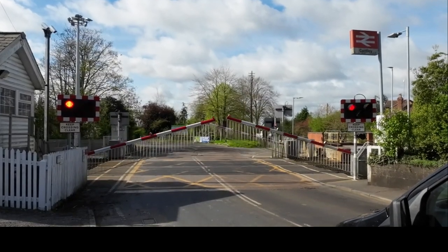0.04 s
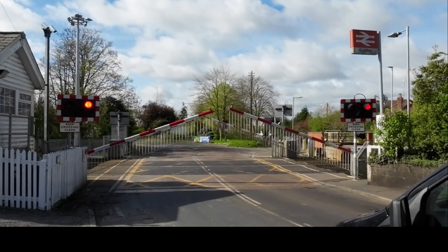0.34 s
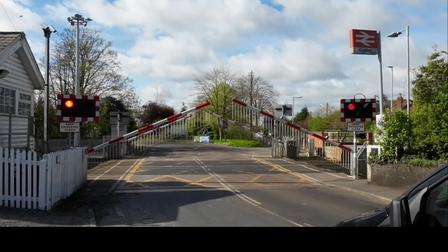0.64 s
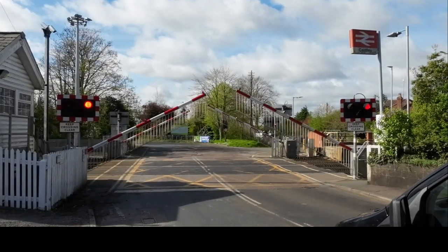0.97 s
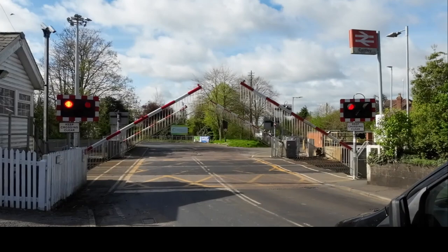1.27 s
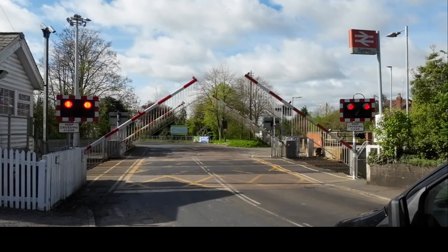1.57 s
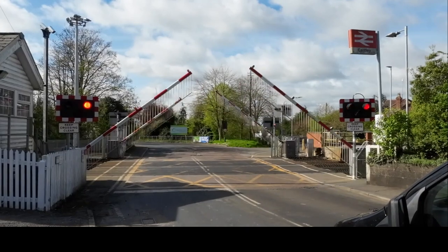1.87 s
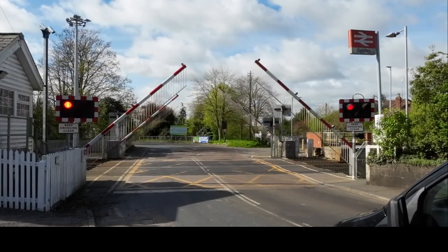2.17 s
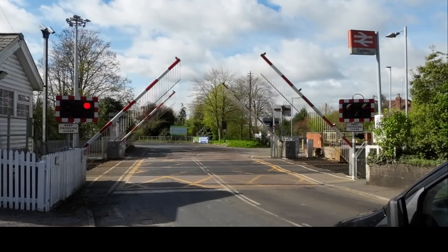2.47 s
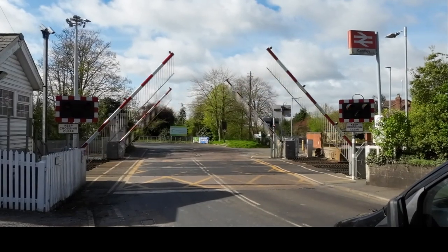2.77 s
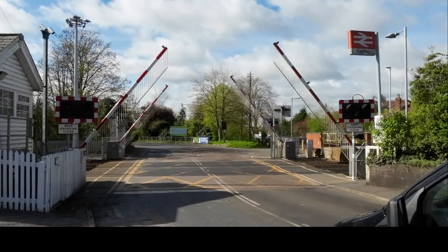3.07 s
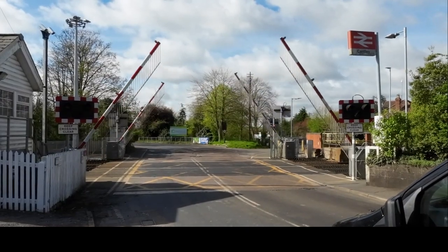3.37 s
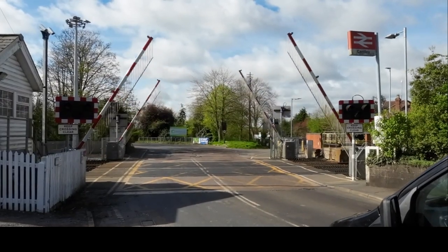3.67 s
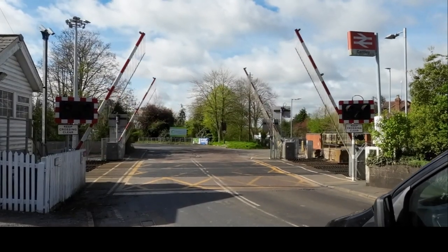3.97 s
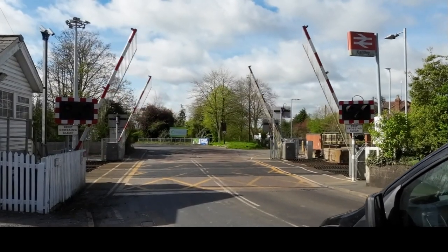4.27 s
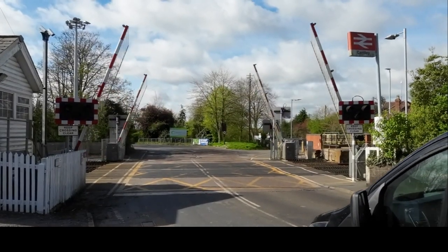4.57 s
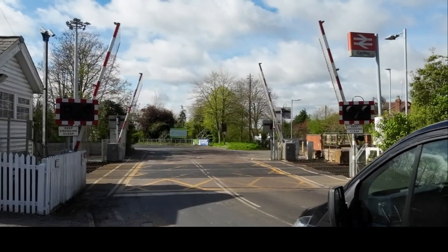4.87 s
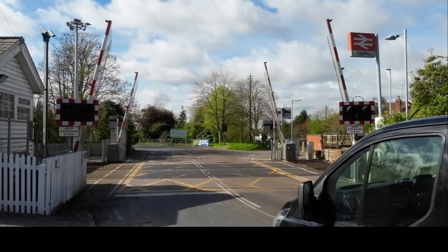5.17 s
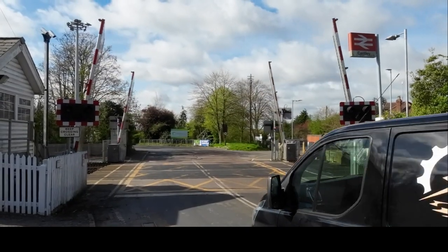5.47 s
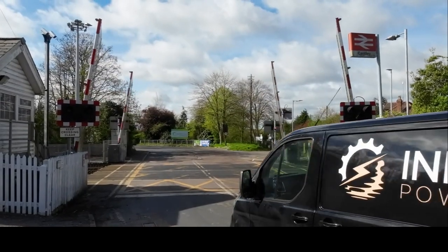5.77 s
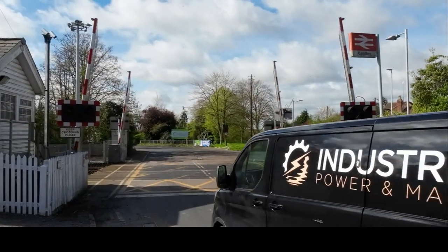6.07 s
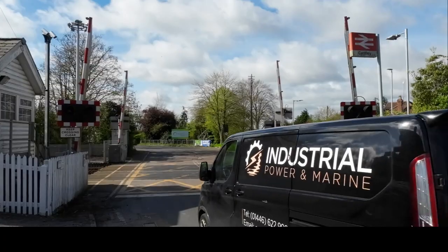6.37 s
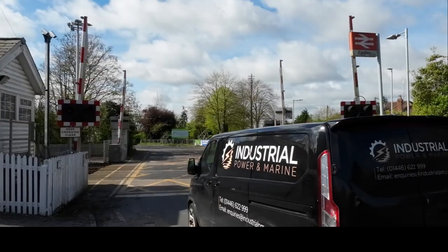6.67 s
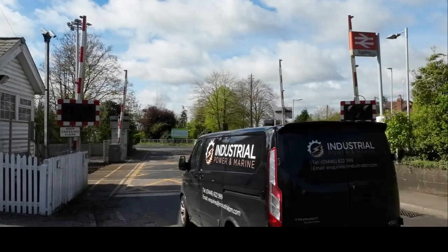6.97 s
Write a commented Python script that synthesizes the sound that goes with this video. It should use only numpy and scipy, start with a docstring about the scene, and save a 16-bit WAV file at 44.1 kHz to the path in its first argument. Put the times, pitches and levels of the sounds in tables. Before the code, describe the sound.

At a railway crossing, a diesel van idles with a low throb while gusty wind rumbles and thumps on the microphone. A barrier clacks twice early on, and hydraulic pumps whine faintly as the arms rise. About four seconds in, the van revs and pulls past close by, with engine clatter and light tyre noise. Small birds whistle over distant traffic, and one fainter clack comes near the end.

```python
"""At a railway crossing, a diesel van idles while the barriers rise, then revs and pulls past the microphone.
Its firings form a pulse train that throbs in the exhaust and excites the resonances of the block; another
car idles behind it. Hydraulic pumps whine, and a barrier clacks twice, then once more faintly near the end.
Small birds whistle over distant traffic and thin high ticks, and the turbulence of a gusty breeze
buffets the microphone."""
import sys
import numpy as np
from scipy import signal
from scipy.fft import rfft, irfft
from scipy.io import wavfile
from scipy.ndimage import uniform_filter1d, map_coordinates

SR = 44100
rng = np.random.default_rng(int(sys.argv[2]) if len(sys.argv) > 2 else 0)


def to_wav(sig):
    """Store sig (one row per channel, or 1-D mono) as 16-bit WAV at the path in sys.argv[1].

    Samples outside -1..1 are clipped; the rate is SR.
    """
    pcm = np.clip(np.atleast_2d(sig), -1, 1) * 32767
    pcm = np.round(pcm).astype(np.int16)
    wavfile.write(sys.argv[1], SR, pcm.T)  # frames by channels


N = 314433


def undb(db):
    """Amplitude ratio of a level in decibels."""
    return 10 ** (np.asarray(db) / 20)


def unit(x):
    """Normalisation to rms 1."""
    return x / np.sqrt(np.mean(x ** 2))


def curves(table):
    """Linear interpolation of each column of a time table, one value a sample."""
    s, *columns = np.transpose(table)
    return [np.interp(np.arange(N) / SR, s, c) for c in columns]


def gains(points, size):
    """Magnitude response through (f/Hz, level/dB) points, interpolated in log frequency."""
    hz, db = np.transpose(points)
    return undb(np.interp(np.log(np.fft.rfftfreq(size, 1 / SR) + 1), np.log(hz), db))


def colour(x, spectrum, resonances=()):
    """Source-filter model: a spectral envelope and resonances shape x; rms 1."""
    size = x.shape[-1]
    f, gain = np.fft.rfftfreq(size, 1 / SR), gains(spectrum, size)
    for hz, width, db in resonances:
        gain = gain * (1 + (undb(db) - 1) / (1 + 2j * (f - hz) / width))
    return unit(irfft(rfft(x) * gain, size))


def band(x, hz, width_hz):
    """Band-pass filtering about hz; rms 1."""
    edges = [hz - width_hz / 2, hz + width_hz / 2]
    return unit(signal.sosfilt(signal.butter(2, edges, "band", fs=SR, output="sos"), x))


def wander(rate_hz):
    """Random modulation: steps at rate_hz, smoothed twice; rms 1."""
    hold = int(SR / rate_hz)
    steps = np.repeat(rng.standard_normal(N // hold + 1), hold)
    return unit(uniform_filter1d(uniform_filter1d(steps, hold), hold)[:N])


def add(out, s, sound):
    """Superposition of a short sound at time s."""
    i = max(int(s * SR), 0)
    out[:, i:i + sound.shape[-1]] += sound[..., :max(N - i, 0)]


# Width of the sound field: f/Hz, side minus mid level/dB
FIELD_WIDTH = [(100, -58), (700, -102), (1150, -21.5), (2000, -20.5), (4000, -7), (5500, -7), (7000, -7.5),
               (9000, -2.5), (12000, -2)]
def noise(size=N):
    """Partial coherence: two channels of noise, alike in the bass and wide in the treble."""
    mid, side = rng.standard_normal((2, size))
    side = irfft(rfft(side) * gains(FIELD_WIDTH, size), size)
    return np.array([mid + side, mid - side])


# Spectrum of distant traffic and leaves: f/Hz, relative level/dB
TOWN_SPECTRUM = [(20, 3), (60, 16.5), (150, 7), (300, 6.5), (470, 7), (570, 1), (1000, 0), (1500, -7.5),
                 (3000, -4.5), (4000, -8), (5200, 0), (6800, -17), (9700, -15.5), (11200, -17.5),
                 (12800, -30)]
def town(level_db=-48.5, swell_db=0.5):
    """Incoherent sources: distant traffic and leaves sum to a noise that swells slightly."""
    return undb(level_db + swell_db * wander(3.2)) * colour(noise(), TOWN_SPECTRUM)


def ticks(every_s=0.143, hz=10350, width_hz=450, length_s=0.0064, level_db=-59.5):
    """Narrow-band noise in Gaussian envelopes is heard as an even run of faint, high ticks."""
    out, t = np.zeros((2, N)), np.arange(SR // 20) / SR
    envelope = undb(level_db) * np.exp(-(t / length_s - 2) ** 2)
    for k in range(1, 9):
        add(out, k * every_s - 2 * length_s, envelope * band(noise(len(t)), hz, width_hz))
    return out


def twitter(from_s=1.2, span_s=3.1, centre_hz=4950, spread_hz=550, slide_hz=250):
    """A random process scatters the notes of far birds in time and pitch; rows as in BIRD_NOTES."""
    notes = []
    for when, pitch, slide in rng.random((16, 3)):
        hz = centre_hz + spread_hz * (2 * pitch - 1)
        notes.append((from_s + span_s * when, 0.04012, hz, hz + slide_hz * (2 * slide - 1), -60))
    return notes


# Birds' notes: t/s, duration/s, start f/Hz, end f/Hz, relative level/dB
BIRD_NOTES = [(1.39, .2, 8000, 7530, -63), (1.65, .22, 7880, 7500, -64.5), (1.91, .18, 7850, 7450, -58.5),
              (2.19, .07, 6600, 6240, -57.5), (2.38, .16, 4530, 4500, -56), (2.371, .07, 6500, 6100, -61),
              (3.503, .033, 4200, 4950, -55), (3.78, .073, 6250, 6080, -59), (3.867, .03, 5050, 4750, -53),
              (5.81, .06, 3930, 4100, -54), (6.004, .05, 4680, 4570, -50), (6.068, .07, 3940, 4200, -50),
              (6.258, .05, 4660, 4590, -47.5), (6.26, .085, 6600, 6050, -55),
              (6.32, .08, 3890, 4220, -52.5), (6.6, .04, 3980, 4020, -56)]
def birds(song_db=-5, flutter_db=4.5, waver=0.007, echo_db=-5, echo_s=0.03):
    """Frequency modulation: thin whistles glide and level off; scattering by trees adds an echo."""
    song, wobble = np.zeros((2, N)), 1 + waver * wander(260)
    repeated_call = [(0.1 + k * 0.45, 0.12, 5070, 4900, -58) for k in range(4)]
    for s, length, start_hz, end_hz, db in repeated_call + BIRD_NOTES + twitter():
        u = np.linspace(0, 1, int(length * SR))
        hz = (end_hz + (start_hz - end_hz) * (1 - u) ** 1.4) * wobble[int(s * SR):][:len(u)]
        envelope = undb(db) * np.sqrt(2 * np.abs(np.sin(np.pi * u)))
        add(song, s, envelope * np.sin(2 * np.pi * np.cumsum(hz) / SR))
    song *= undb(song_db + flutter_db * wander(90))
    t = np.arange(SR // 3) / SR
    trees = unit(rng.standard_normal((2, len(t))) * np.exp(-t / echo_s)) / np.sqrt(len(t))
    return song + undb(echo_db) * signal.fftconvolve(song, trees, axes=1)[:, :N]


# Lines of the pumps' whine: f/Hz, level before the gain/dB
PUMP_WHINE = [(727, -68), (813, -66.5), (1048, -61), (1700, -63), (1750, -65), (2309, -67.5), (2449, -67.5),
              (2676, -71), (2778, -71.5), (3260, -69.5), (3480, -66)]
# Course of the whine: t/s, gain/dB
PUMP_GAIN = [(0, 1), (5.6, 2), (6.4, -14)]
def pumps(width_hz=65):
    """Line broadening: the barriers' hydraulic pumps whine roughly, in narrow bands of noise."""
    lines = sum(undb(db) * band(rng.standard_normal(N), hz, width_hz) for hz, db in PUMP_WHINE)
    return undb(curves(PUMP_GAIN)[0]) * lines


# Impacts of the barrier: t/s, crack level/dB, ring f/Hz, ring level/dB
IMPACTS = [(0.683, -32, 2810, -30), (0.696, -47, 3090, -37), (0.877, -36, 2631, -29.5),
           (6.836, -43, 2600, -62)]
# Spectrum of the crack: f/Hz, relative level/dB
CRACK_SPECTRUM = [(200, 4), (800, 2), (2800, 1.5), (5200, 0.5), (7000, -9), (10000, -10.5), (13000, -39)]
# Modes of the barrier's panels: f/Hz, bandwidth/Hz, gain/dB
PANEL_MODES = [(915, 120, 11), (1292, 48, 14), (1765, 25, 13.5), (2890, 220, 11), (3570, 110, 7.5),
               (3970, 55, 1)]
def barrier(attack_s=0.0014, crack_s=0.021, street_s=0.038, ring_s=0.0054, linger_s=0.032):
    """Impact excitation: the barrier's hanging skirt rings on two close modes; the street adds a tail."""
    out, t = np.zeros((2, N)), np.arange(SR // 4) / SR
    attack = 1 - np.exp(-t / attack_s)
    crack_decay = np.exp(-t / crack_s) + undb(-11) * np.exp(-t / street_s)
    ring_decay = np.exp(-t / ring_s) + undb(-17) * np.exp(-t / linger_s)
    for s, crack_db, hz, ring_db in IMPACTS:
        crack = crack_decay * colour(noise(len(t)), CRACK_SPECTRUM, PANEL_MODES)
        modes = np.sin(2 * np.pi * hz * t) + undb(-5) * np.sin(2 * np.pi * 1.065 * hz * t)
        add(out, s, attack * (undb(crack_db) * crack + undb(ring_db) * ring_decay * modes))
    return out


# Strength of the breeze: t/s, level/dB
GUSTS = [(0, -26), (.25, -23.5), (.45, -21.5), (.9, -28.5), (1.1, -31), (1.76, -33), (1.9, -22),
         (2.25, -31), (2.6, -22), (2.95, -28), (3.3, -20), (3.65, -27), (4.1, -27.5), (4.55, -25),
         (4.78, -18.5), (5.12, -22.5), (5.4, -22), (5.9, -31.5), (6.1, -22), (6.3, -27.5), (6.5, -25),
         (6.7, -28.5), (6.87, -22), (7.13, -25)]
# Spectrum of the turbulence: f/Hz, relative level/dB
WIND_SPECTRUM = [(8, -21), (18, 1.5), (28, -3), (45, -5.5), (70, -14.5), (110, -23), (200, -37),
                 (400, -47.5), (900, -109)]
def breeze(flutter_db=2.0):
    """Turbulent pressure rumbles on the microphone, swelling with every gust."""
    rumble = undb(flutter_db * wander(14)) * colour(rng.standard_normal(N), WIND_SPECTRUM)
    return undb(curves(GUSTS)[0]) * unit(rumble)


def swing(hz, skew, order=3):
    """A pressure wavelet strongest near hz: phase skew (cycles) tilts it, a higher order rounds it."""
    t = np.arange(-SR // 20, SR // 20) / SR
    wavelet = np.exp(2j * np.pi * skew) / (1 - 2j * np.pi * hz * t / (order - 1)) ** order
    return wavelet.real * np.hanning(len(t))


def eddies(count=16, weakest_db=-13, range_db=8, centre_hz=110, spread_octaves=0.88):
    """Intermittency of turbulence: weak eddies bump the microphone at random, harder in a gust."""
    out, gust_db = np.zeros((2, N)), curves(GUSTS)[0]
    for when, size, pitch, skew in rng.random((count, 4)):
        i = int(when * N)
        bump = swing(centre_hz * 2 ** (spread_octaves * (2 * pitch - 1)), skew)
        add(out, (i - len(bump) / 2) / SR, undb(gust_db[i] + weakest_db + range_db * size) * bump)
    return out


# Strongest eddies: t/s, thump level/dB, thump f/Hz before pitch_ratio, pop level/dB, pop f/Hz
STRONG_EDDIES = [(.136, -16.5, 75, -34, 190), (0.167, -7, 48.6, -45, 160), (.239, -8.5, 46, -28.5, 200),
                 (.275, -13, 29.8, -45, 150), (0.331, -23, 100, -15, 154), (.506, -21, 90, -34, 169.8),
                 (0.525, -27, 80, -30, 230), (.592, -22, 85.5, -38, 150), (.66, -17, 59.6, -24.5, 229),
                 (0.73, -20, 90, -21, 197), (.894, -18.5, 79, -39, 170), (0.944, -13.5, 57, -46, 150),
                 (1.38, -16.5, 91, -30, 180), (1.402, -22.5, 120, -43, 190), (1.823, -29, 130, -49, 170),
                 (1.851, -10, 31.2, -34, 150), (2.323, -27, 110, -27.5, 170), (2.557, -11.5, 70, -41, 150),
                 (2.699, -13, 33.52, -49, 150), (2.732, -9, 32.6, -36, 160.1), (2.912, -20, 81, -31, 200.2),
                 (3.013, -26, 90, -30, 210), (3.044, -28, 80, -33, 220), (3.166, -18.5, 69.9, -31, 180),
                 (3.199, -18, 130, -26, 314), (3.239, -9.5, 28, -36, 350), (3.34, -12.5, 51.94, -24, 200),
                 (3.347, -19, 150, -20, 305), (3.414, -13, 30, -46, 150), (3.516, -15.5, 81.5, -33, 190),
                 (3.646, -16.5, 83, -26, 240), (3.809, -17, 50, -46, 150), (4.468, -16, 54.6, -49, 150),
                 (4.63, -15, 65, -33, 150), (4.682, -25, 65, -41, 170), (4.715, -9.5, 59, -42, 170.2),
                 (4.796, -23, 70, -19, 190), (5.261, -27, 150, -20.5, 218), (5.383, -13, 84.5, -29, 200),
                 (5.553, -18, 131, -22.5, 266), (5.672, -19, 130, -16, 240), (6.085, -17, 55, -48, 149.5),
                 (6.141, -20, 60, -42, 150), (6.485, -15, 65.6, -40, 150), (6.821, -7.5, 78.7, -21, 250),
                 (6.847, -8, 75, -22, 250), (6.866, -16, 149.7, -22, 230.3), (6.878, -6, 172, -29, 250),
                 (6.893, -20, 130, -25, 190), (6.909, -20, 90, -34, 170.1), (6.971, -7.5, 64, -10, 275),
                 (6.98, -21.5, 557, -26, 657)]
# Spectrum of an eddy breaking up: f/Hz, relative level/dB
FLURRY_SPECTRUM = [(100, 14), (250, 4), (420, -4.5), (650, -10.5), (1100, -20.5), (1600, -52)]
def buffets(pitch_ratio=0.71, trail_s=0.00557, lopsided=0.23, flurry_db=-15, flurry_s=0.0099):
    """Eddy cascade: a large eddy thumps the microphone; a small one trails it, pops and breaks up."""
    out, skews = np.zeros((2, N)), rng.random((len(STRONG_EDDIES), 2))
    for (s, db, hz, pop_db, pop_hz), (lean, pop_skew) in zip(STRONG_EDDIES, skews):
        thump = undb(db) * swing(pitch_ratio * hz, lopsided * (lean - 0.5))
        t = (np.arange(len(thump)) - len(thump) / 2) / SR
        envelope = undb(flurry_db) * np.exp(-(t / flurry_s) ** 2)
        flurry = envelope * colour(rng.standard_normal(len(t)), FLURRY_SPECTRUM)
        add(out, s + t[0], thump)
        add(out, s + t[0] + trail_s, undb(pop_db) * (swing(pop_hz, pop_skew, order=6) + flurry))
    return out


# Upper lines of an exhaust: multiple of the firing rate, relative level/dB
EXHAUST_ORDERS = [(2.5, -4), (3.5, -10), (4, -2), (4.5, -3), (5, -5), (6, -4), (7, -9), (8, -13), (9, -9.5),
                  (11, -14)]
# Modes of the tailpipe: f/Hz, bandwidth/Hz, gain/dB
PIPE_MODES = [(155, 27, 3), (203, 16, 7.5), (466.3, 30, 11)]
def overtones(firings, rough_db=3.0):
    """Pipe resonance lifts each unsteady exhaust line that crosses it; firings counts elapsed cycles."""
    lines = sum(undb(db + rough_db * wander(6)) * np.sin(2 * np.pi * (order * firings + rng.random()))
                for order, db in EXHAUST_ORDERS)
    return colour(lines, [(80, 0.5), (600, -2.5)], PIPE_MODES)


def waiting_car(firing_hz=27.2, hum_db=-52, upper_db=-53):
    """Periodic firing: the next car idles with a hum at its second harmonic, and overtones above."""
    firings = np.cumsum(firing_hz * (1 + 0.00726 * wander(4.2))) / SR
    hum = unit(np.sin(2 * np.pi * 2 * firings))
    return undb(hum_db) * hum + undb(upper_db) * overtones(firings)


def motion(move_off_s=3.716, accel_m_s2=1.545):
    """Uniform acceleration from rest: the van's speed in m/s and its travel in m."""
    rolling_s = np.maximum(np.arange(N) / SR - move_off_s, 0)
    return accel_m_s2 * rolling_s, accel_m_s2 * rolling_s ** 2 / 2


def nearness(behind_m=0, queue_m=2.08, kerb_m=2.26):
    """Spherical spreading: 1/r gain of a part behind_m behind the van's engine; 1 when alongside."""
    _, travel_m = motion()
    return kerb_m / np.hypot(travel_m - queue_m - behind_m, kerb_m)


# Spectrum of tyres on tarmac: f/Hz, relative level/dB
TYRE_SPECTRUM = [(60, 14), (200, -2), (450, -37), (600, -2), (780, 7), (980, -8.5), (1230, 4), (1600, -5.5),
                 (3000, -16.5), (7000, -45), (12000, -36)]
def tyres(level_db=-54.5, patchy_db=2.5):
    """Rolling noise from the rear axle grows with road speed; level_db holds alongside at 1 m/s."""
    speed_m_s, _ = motion()
    gain = undb(level_db + patchy_db * wander(9.1)) * speed_m_s * nearness(behind_m=2.3)
    return gain * colour(noise(), TYRE_SPECTRUM)


# Brief tones of the passing van: peak t/s, duration/s, f/Hz, glide/(Hz/s), bandwidth/Hz, level/dB
PASSING_TONES = [(4.961, 0.19, 3600, -300, 200.1, -50), (5.38, 0.23, 2126, 0, 70, -51),
                 (5.65, .2, 3407, -150, 150, -49), (5.9, 0.54, 2940, 99, 200, -53),
                 (6.444, 0.37, 2164, 1.5, 129.6, -55), (6.599, 0.47, 1230, -170, 70, -55),
                 (6.6, 0.58, 763, -1, 50, -57)]
def passing_tones():
    """Narrow-band noise is heard as pitch: tones swell, slide a little and fade as the van goes by."""
    out, t = 0, np.arange(N) / SR
    for s, length, hz, glide, width, db in PASSING_TONES:
        lowpass = signal.butter(2, width / 2, fs=SR, output="sos")
        blur = signal.sosfilt(lowpass, rng.standard_normal((2, N)))
        phase = 2 * np.pi * np.cumsum(hz + glide * (t - s)) / SR
        tone = unit(blur[0] * np.cos(phase) + blur[1] * np.sin(phase))
        out = out + undb(db) * np.exp(-(2 * (t - s) / length) ** 2) * tone
    return out


# Firing rate of the van's engine: t/s, f/Hz
FIRING_RATE = [(4.2, 27.98), (4.45, 33.56), (4.6, 37.18), (4.8, 46.4), (5.0, 52.44), (5.15, 51.8),
               (5.52, 48.92), (5.87, 44.5), (6.19, 38.29), (6.45, 41.85), (6.65, 43.2), (7.13, 44.4)]
def crankshaft(unsteady=0.00253):
    """Phase is the integral of frequency: the van's elapsed firing cycles."""
    return np.cumsum(curves(FIRING_RATE)[0] * (1 + unsteady * wander(9))) / SR


def revs():
    """Frequency ratio of the van's engine to its idle, in octaves."""
    firing_hz = curves(FIRING_RATE)[0]
    return np.log2(firing_hz / firing_hz[0])


def bay_gain(idle_db=-45.5, db_per_octave=8, strain_db=1.5):
    """Radiation from the engine bay grows with the revs, with their rate of climb and with nearness."""
    climb = uniform_filter1d(np.maximum(np.gradient(revs()) * SR, 0), SR // 2)  # octaves a second
    return undb(idle_db + db_per_octave * revs() + strain_db * climb) * nearness()


# Spectrum of the diesel knock: f/Hz, relative level/dB
KNOCK_SPECTRUM = [(400, -46), (900, -9.5), (1700, 1), (2300, 0), (3000, 2.5), (3550, -4), (4000, -52),
                  (5400, -18), (7000, -13.5), (12000, -25)]
# Modes of the block and covers: f/Hz, bandwidth/Hz, gain/dB
BLOCK_MODES = [(668, 104, 4.5), (946, 20, 4.5), (1180, 25, 4), (1539, 13, 5.5), (2106, 31, 6.5),
               (2845, 43, 3.5), (3720, 200, 5)]
def knock(firings, idle_db=-63.5, db_per_octave=24, scatter_db=2.2):
    """Impulsive excitation: under load each injection rings the block, rasping out of the wheel arch."""
    index = firings.astype(int)
    size_db = scatter_db * rng.uniform(-1, 1, index[-1] + 1)[index]
    rasp = colour(noise() * undb(size_db) * np.exp(-(firings % 1)), KNOCK_SPECTRUM, BLOCK_MODES)
    return undb(idle_db + db_per_octave * revs()) * nearness(behind_m=0.3) * rasp


# Spectrum of the clatter: f/Hz, relative level/dB
CLATTER_SPECTRUM = [(100, 6), (250, 5), (470, 6.5), (580, -3.5), (1000, 1), (1900, -4), (3100, -6.5),
                    (4100, -12), (5400, -6), (6900, -16.5), (8500, -11.5), (10300, -12.5), (12500, -29.5),
                    (15500, -54)]
# Broad resonance of the engine bay: f/Hz, bandwidth/Hz, gain/dB
BAY_MODE = [(472, 55, 4)]
def clatter(firings, valve_db=-4, scatter_db=3, cylinder_db=3.5, fade_cycles=0.42, wash=0.6):
    """Damped impacts: four unequal cylinders knock the block, and the valve gear ticks in between."""
    stroke = (2 * firings).astype(int)
    chance = rng.uniform(-1.9, 1, stroke[-1] + 1)[stroke]
    cylinder = rng.uniform(-1, 1, 8)[stroke % 8]
    size_db = scatter_db * chance + cylinder_db * cylinder + valve_db * (stroke % 2)
    knocks = undb(size_db) * np.exp(-(2 * firings % 1) / (2 * fade_cycles))
    rattle = colour(noise() * np.hypot(wash, knocks), CLATTER_SPECTRUM, BAY_MODE + BLOCK_MODES)
    treble = rattle - signal.sosfilt(signal.butter(1, 3000, fs=SR, output="sos"), rattle)
    return bay_gain() * (rattle + (undb(0.5) - 1) * treble)


def looped_noise(position):
    """Spline interpolation round a loop of 1024 random values, one per unit of position."""
    return map_coordinates(rng.standard_normal(1024), [position], order=3, mode="grid-wrap")


def gear_whirr(firings, relative_db=-2.5):
    """Periodicity gives a line spectrum: chain, pump and gears repeat one rattle each camshaft turn."""
    camshaft_turns = firings / 4
    rattle = looped_noise(camshaft_turns % 1 * 1024)
    return bay_gain() * undb(relative_db) * colour(rattle, CLATTER_SPECTRUM, BAY_MODE + BLOCK_MODES)


# Boom of the exhaust: t/s, then level/dB of the firing note, its octave and its third harmonic
BOOM_LEVELS = [(0, -35.5, -32, -52), (1.7, -30, -33, -48), (2.9, -25, -29.5, -51), (4.3, -22.5, -32.5, -47),
               (4.6, -21.5, -39, -38), (4.8, -15.5, -33, -36), (5.05, -17, -29, -44),
               (5.4, -16, -34.5, -40), (5.6, -21.5, -33, -36.5), (5.87, -29, -33, -35.5),
               (6.15, -33.5, -29.5, -47), (6.45, -33, -35, -41), (6.7, -30, -32, -52),
               (7.13, -37, -34.5, -43)]
# Spectrum of the gas leaving the tailpipe: f/Hz, relative level/dB
GAS_SPECTRUM = [(45, -12), (75, 4.5), (120, 3), (170, -12.5), (260, -12), (420, -17.5), (700, -51)]
def exhaust(firings, jitter_cycles=0.008, scatter_db=1.5, lump_db=-18, puff_cycles=0.42):
    """A pressure pulse train: the firings give a note, its harmonics and a puff of gas each."""
    unevenness = 1 + revs()
    jittered = firings + jitter_cycles * unevenness * looped_noise(firings)
    strength = undb(scatter_db * unevenness * looped_noise(firings))
    phase = 2 * np.pi * jittered
    note_db, octave_db, third_db = curves(BOOM_LEVELS)
    subharmonic = undb(lump_db) * np.cos(phase / 2)  # strong and weak firings alternate
    note = undb(note_db + 1.2 * wander(15)) * unit(np.cos(phase) + subharmonic)
    octave = undb(octave_db + 1.5 * wander(15)) * unit(np.cos(2 * phase))
    third = undb(third_db) * unit(strength * np.cos(3 * phase))
    upper = undb(-45 + 4.5 * revs()) * unit(strength * overtones(jittered))
    puffs = rng.standard_normal(N) * np.exp(-(firings % 1) / puff_cycles)
    gas = undb(-47 + 4 * revs()) * colour(puffs, GAS_SPECTRUM)
    muffler = nearness(behind_m=0.61) * (upper + gas)
    return note + octave + third + muffler


def van():
    """Phase locking: one crankshaft times all the engine's sounds; brief tones and tyres join them."""
    firings = crankshaft()
    engine = exhaust(firings) + knock(firings) + clatter(firings) + gear_whirr(firings)
    return engine + passing_tones() + tyres()


def scene():
    """Linear superposition of every source at the crossing."""
    vehicles = van() + waiting_car()
    wind = breeze() + buffets() + eddies()
    return vehicles + wind + barrier() + pumps() + birds() + ticks() + town()


# Imbalance of the microphone's two ports: f/Hz, left minus right level/dB
PORT_BALANCE = [(60, .6), (180, .75), (400, 0), (1000, 0), (2000, .9), (4500, 1.3), (8000, .9),
                (12000, -.4)]
def record(dry, lead_s=1.3e-5, top_hz=15700):
    """Level and time differences: the ports differ in colour and the right leads; the top is cut."""
    half_delay = np.exp(-1j * np.pi * np.fft.rfftfreq(N, 1 / SR) * lead_s)
    left = np.sqrt(gains(PORT_BALANCE, N)) * half_delay
    ports = irfft(rfft(dry) * np.array([left, 1 / left]), N)
    return signal.sosfilt(signal.ellip(8, 0.2, 70, top_hz, fs=SR, output="sos"), ports)


dry = scene()
out = record(dry)
to_wav(out)
```